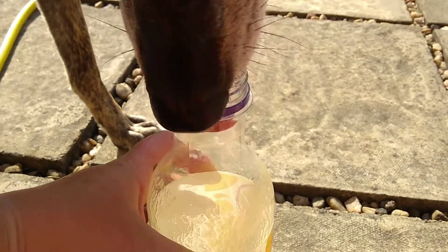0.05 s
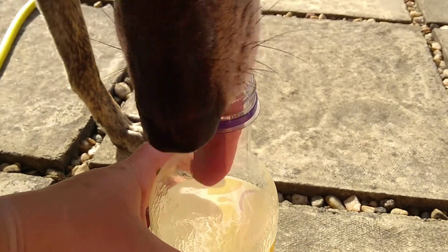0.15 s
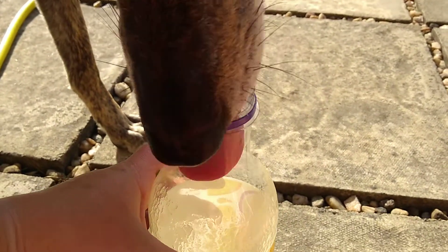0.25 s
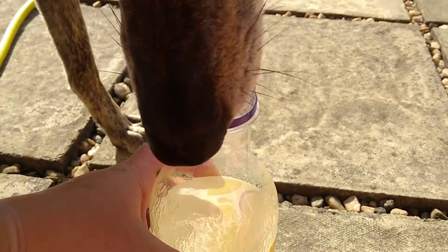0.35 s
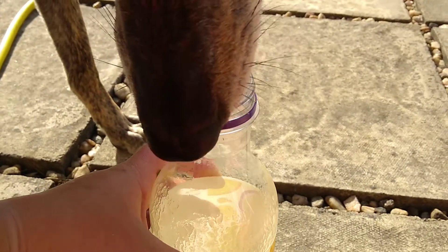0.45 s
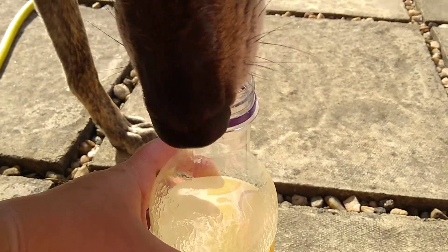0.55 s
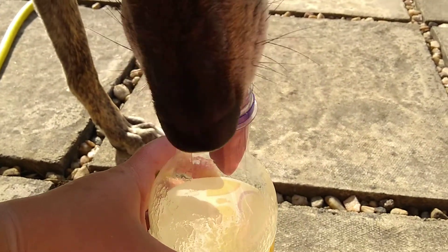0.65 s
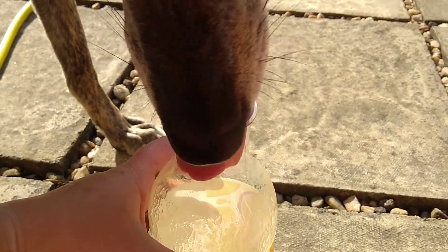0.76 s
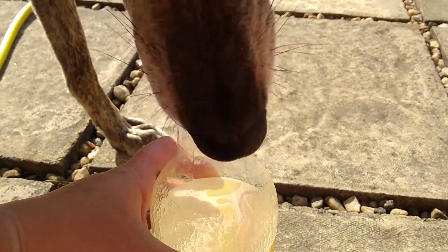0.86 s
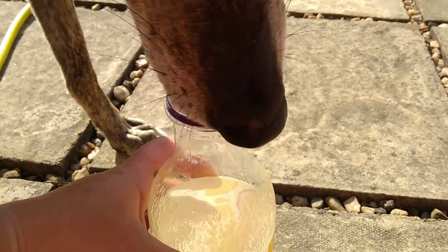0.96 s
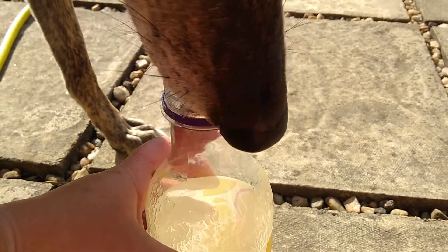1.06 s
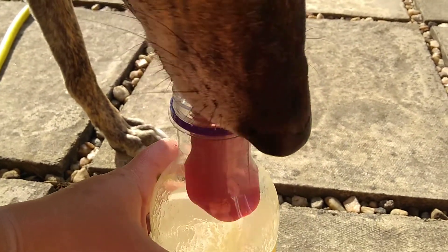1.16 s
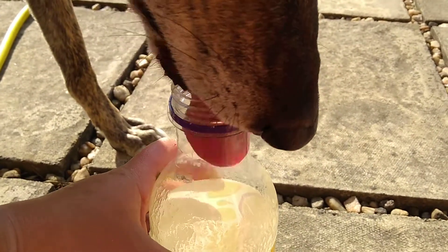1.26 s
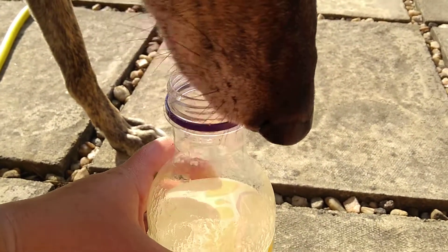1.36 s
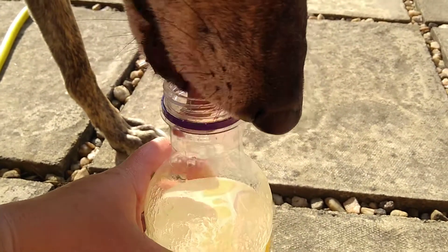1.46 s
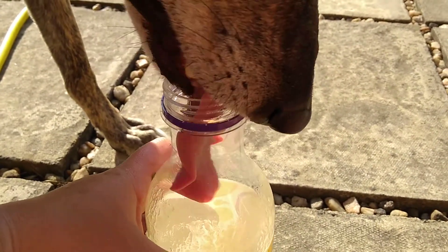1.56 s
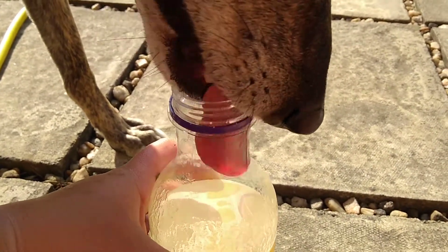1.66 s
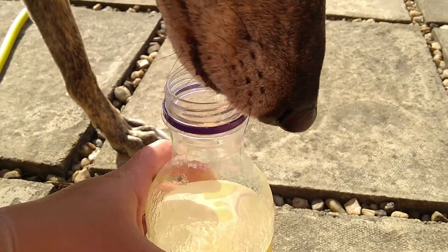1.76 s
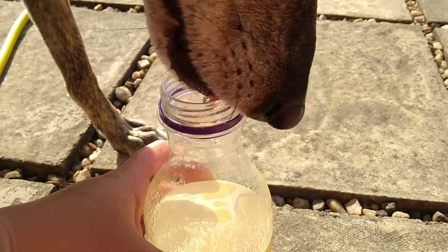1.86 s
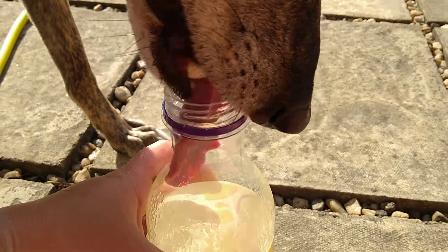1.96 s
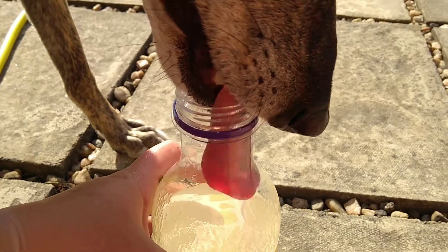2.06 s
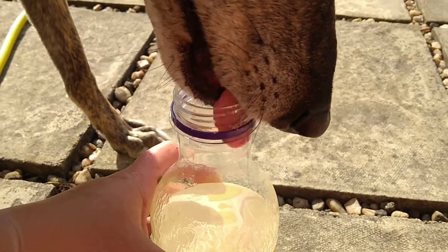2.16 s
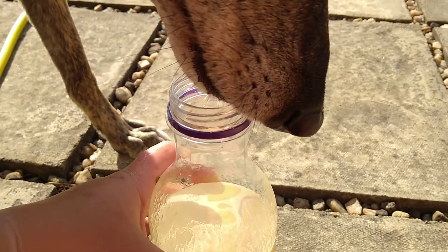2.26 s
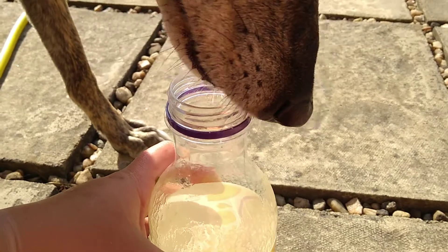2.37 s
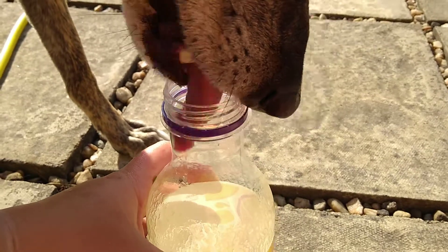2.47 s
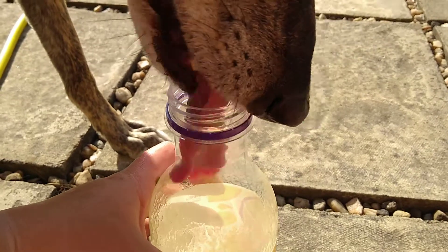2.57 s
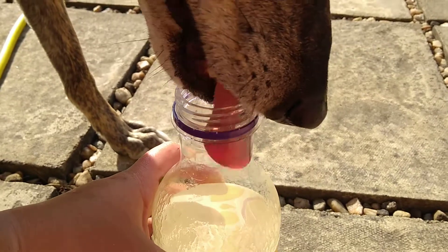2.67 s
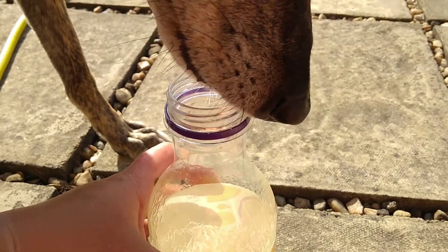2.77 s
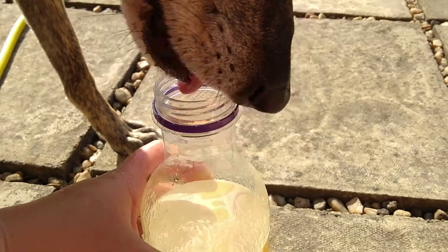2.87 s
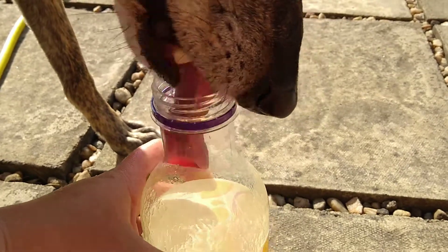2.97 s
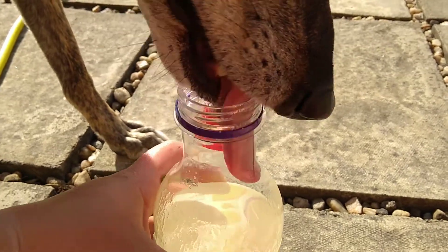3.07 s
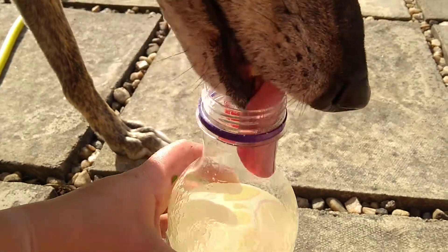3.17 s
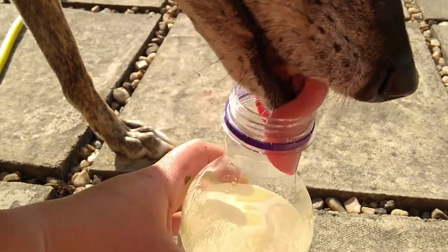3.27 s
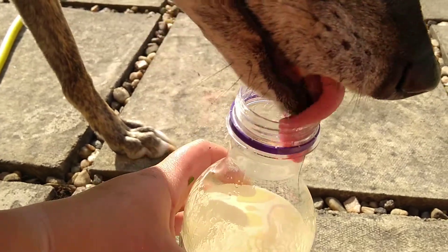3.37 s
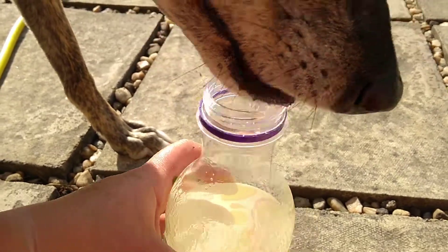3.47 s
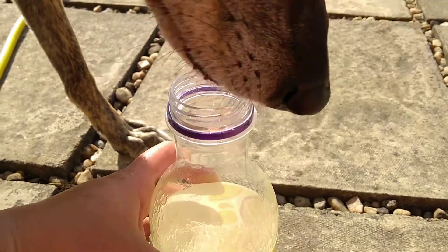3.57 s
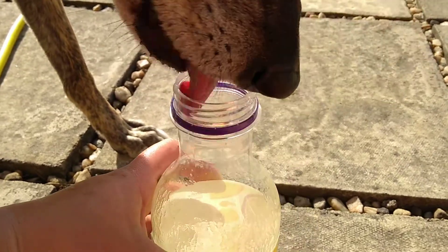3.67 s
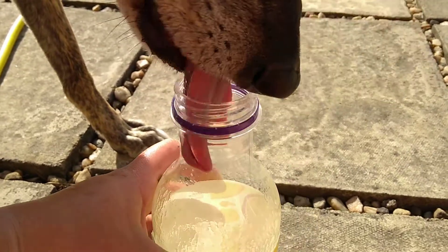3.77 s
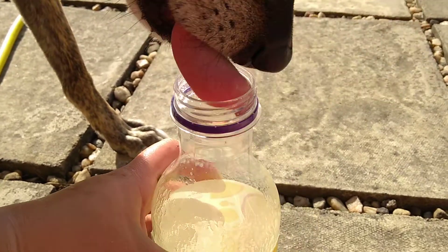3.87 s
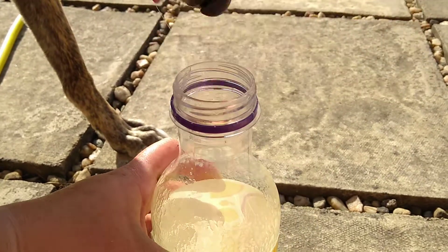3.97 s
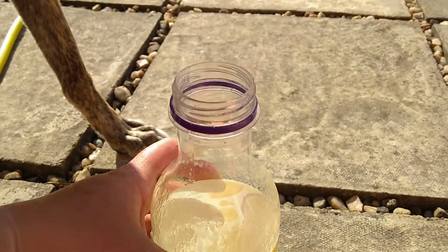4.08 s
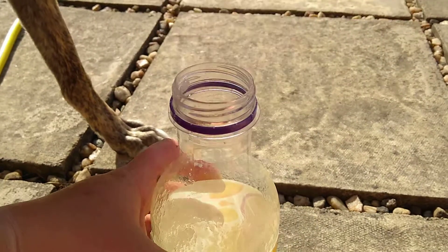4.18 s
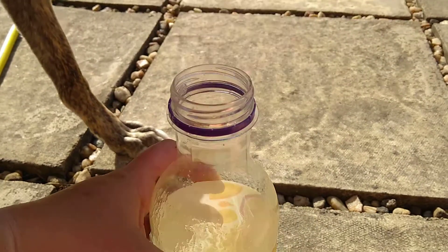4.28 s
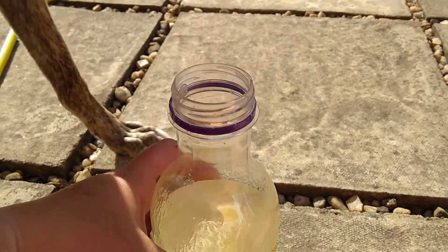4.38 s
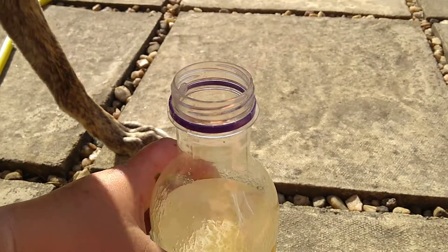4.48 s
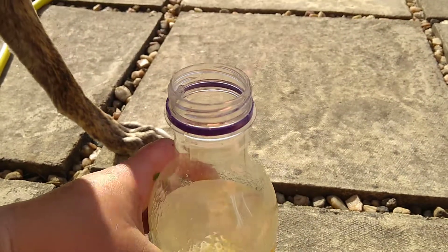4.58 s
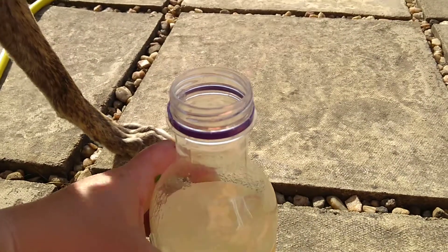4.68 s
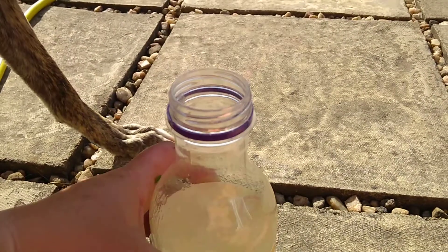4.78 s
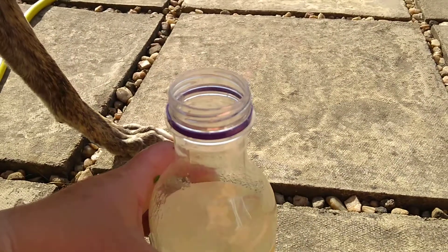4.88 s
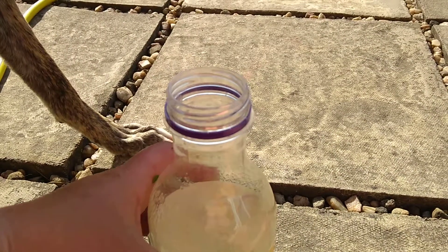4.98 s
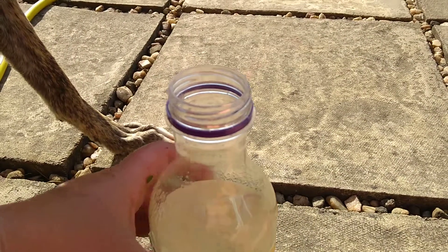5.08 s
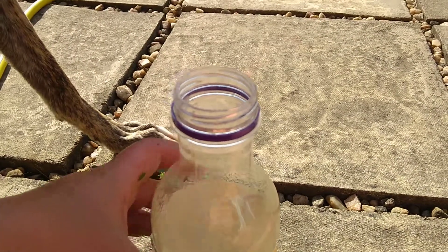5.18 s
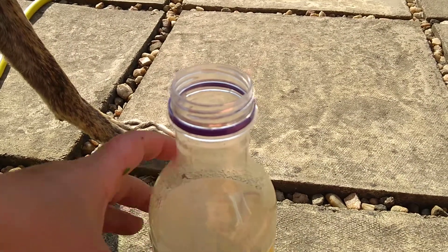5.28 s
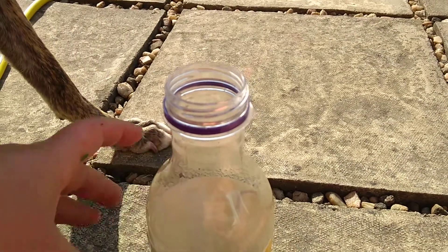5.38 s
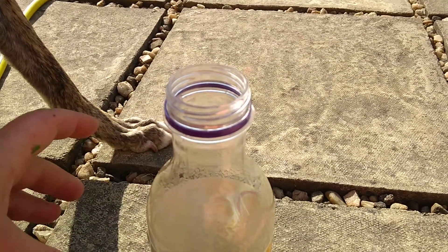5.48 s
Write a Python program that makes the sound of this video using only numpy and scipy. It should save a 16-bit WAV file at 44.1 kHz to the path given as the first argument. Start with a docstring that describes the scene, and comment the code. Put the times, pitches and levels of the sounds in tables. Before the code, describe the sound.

Close-up outdoor wet mouth sounds: a dog's tongue smacks and clicks inside a bottle neck, each lick leaving sticky squelch and fizzing saliva. The densest lapping is in the first three seconds, with low air-filled pops and knocks. Then sparse bubbly gulps and a slurp, the dog lifts away, and only small wet ticks and light hand movement on plastic are heard over low air rumble and a gentle breeze. Dry patio, little echo.

```python
"""A dog laps from the neck of a plastic bottle on a patio, close to two microphone ports.
Films of saliva on tongue and lips tear with wet snaps: short bursts of noise shaped by resonances.
Tongue pops leave the bottle's air humming; knocks and single bubbles are decaying sine tones.
Clouds of tiny ticks make wet squelch, hiss and fizz, and filtered slips make skin rub on plastic.
Below lies a low outdoor rumble of filtered noise, joined by a light gust of wind.
"""
import sys
import numpy as np
from scipy import signal
from scipy.fft import rfft, irfft
from scipy.io import wavfile
from scipy.ndimage import uniform_filter1d

SR = 44100
rng = np.random.default_rng(int(sys.argv[2]) if len(sys.argv) > 2 else 0)


def generate_wav(sig):
    """Save sig (samples, or channels by samples) to the path in sys.argv[1] as 16-bit PCM at SR."""
    pcm = np.round(np.clip(np.atleast_2d(sig).T, -1, 1) * 32767).astype(np.int16)
    wavfile.write(sys.argv[1], SR, pcm)


N = 243873

# centres of the eight bands that describe a snap: pitch_hz
SNAP_BANDS = [450, 1150, 1750, 2600, 3700, 5500, 7500, 11500]
# wet snaps of the tongue, later of fingers on the bottle:
# start_s, eight columns of level_db (one per snap band), air_pocket_hz, tearing_s
LICKS = [(0.0695, 18.5, 9.5, 0, 5.5, -17, -21, -7, -20, 1340, 0.0014),
         (0.2046, 14, 12, -4, -17, 5, -42, -15, -30, 1010, 0.0022),
         (0.242, 14.5, 16.5, 14.5, 11, 17.5, 6, 8.5, -6, 1930, 0.00065),
         (0.418, -23, -34, -28.0, -35.0, -27, -21, -12, -12.5, 8650.0, 0.0007),
         (0.447, 20, 12.5, 12, 5, 26, 4.5, -3, -7, 3980, 0.00065),
         (0.4657, 15, 20, -5, 9, 15, -5, -5, -12.5, 3420, 0.00034),
         (0.7747, 8, 21.5, 18.5, 8, 20, 6, 2, -3.5, 3670, 0.00056),
         (0.8623, 6, -19, -4, -12, -8, -11, -27, -17, 1130, 0.0041),
         (0.9526, 1.5, -4, -9, -14, -1, -8.5, -13, -27.5, 2600.0, 0.00054),
         (0.998, -11, 12.5, 6, 3, -1.5, -3, -7, -18, 5900, 0.0027),
         (1.0117, -4, 1.5, -10.5, -15.5, -18, -12, -16, -29.5, 940, 0.0006),
         (1.056, -17.5, -13, -5.5, -9, -12.5, -13, -20, -30.5, 3100, 0.0014),
         (1.185, 9.5, 13.5, -6, -26, -3, -34, -46, -39, 1080, 0.0017),
         (1.2116, 27.5, 25.5, 21.5, 15, 16, 14, -1.5, -6, 2430, 0.00054),
         (1.234, -5, -10, -8, -16, 0, -20, -31.0, -37.5, 3630, 0.00031),
         (1.291, 8.5, -8, -17.0, -24, -14, -11, -26, -46.5, 3740, 0.00025),
         (1.331, 4, 7.5, 11, 8, 7, -0.5, -6, -14.5, 2830, 0.00061),
         (1.4586, 5.5, 3.5, -4, -30, -7, -28, -33, -28.5, 1380, 0.002),
         (1.4684, 0, -14, -22, -37, -1.5, -25, -13, -28, 4200, 0.0018),
         (1.5293, -40, -6, -5, -17, 2, -12, -27, -29, 3720, 0.0014),
         (1.548, -23, -18, -14, -15, -14, -20, -30, -38, 2650, 0.00092),
         (1.5841, 19.5, -20, -17, -3, 2, 2, -17, -35, 2460, 0.0003),
         (1.644, 17, 8, -10, -5, -17, -7, -16, -32, 3300, 0.0015),
         (1.6538, 17, 22.5, 14.5, 10, 19, 4, 1, -12, 3520, 0.00056),
         (1.8248, 9.5, 3, -6, 0, 14, 2, -7, -27, 3550, 0.0018),
         (1.8346, 22, 9, -1, 4.5, 11, 3, -3, -9.5, 4100, 0.0012),
         (1.88, -2, 2, 4, -15, -13, -11, -6, -16, 6100, 0.0017),
         (2.0019, 1, -7, -3, -7, 10, 3, -4, -13.5, 6100.0, 0.00079),
         (2.057, 9, 2, -8, -8, -25, -5, -34, -45, 1230, 0.0033),
         (2.0656, -8, 15.5, -5, -5, 5, -9, -3, -26, 1090, 0.0085),
         (2.083, 21, 4, 20, 5.5, 15.5, 4, -0.5, -7.5, 3740, 0.00046),
         (2.143, 14, -23, -9, -15, -3, -1.5, -23, -32, 3660, 0.00053),
         (2.2788, -3, 12, 0.5, -9, 18, 0, -7, -11, 4020, 0.00068),
         (2.3004, 19, 13.5, 1, -8, 4, 0, -5, -12, 3800, 0.001),
         (2.3218, 24.5, 15.5, 2, 4.5, 22.5, 4.5, -0.5, -15, 4260, 0.0006),
         (2.364, 14, 16.5, 0, 6, 15.5, 15, 4, -5, 3570, 0.00041),
         (2.535, -41, -10.5, -18, -17, 1.5, -2, -36, -37, 4730, 0.0018),
         (2.557, 5.5, -33, -6, -4.5, 1, -7, -14, -15, 2560, 0.00056),
         (2.632, -8, -2, -26, -18, -4.5, -25.0, -35, -45.5, 1140, 0.0041),
         (2.656, -8, 13, -8, -16, 3, -13, -9, -16, 3500, 0.00034),
         (2.659, 10, 18, 16.5, 6.5, 20, 0, -3.5, -22, 3530, 0.00094),
         (2.7738, -35, -6, -12, -14.5, 1, -18, -13, -12, 2800, 0.0069),
         (2.871, -16, -8, 1, -15, -16, -23, -19.5, -22, 1630, 0.0026),
         (2.89, -22, -2, 4, -21, 7.5, -8, -10.5, -8.5, 3430, 0.0027),
         (3.086, 6, 6, 4, -6, 6, -11, -7.5, -21, 1050, 0.0024),
         (3.6064, 5, 0, 2.5, -8, 2.5, -31.5, -40, -42, 1020, 0.0011),
         (3.622, 9, -1, -13, -21, -3, -43, -42, -51, 1043, 0.0035),
         (3.833, -12, -38, -4, -7.5, 8, -29.5, -12.5, -32, 2740, 0.0012),
         (3.876, -19, -34, -12, -21, -5, -33.5, -15.5, -17, 3600, 0.0013),
         (3.902, -24, -34, -25, -26, -17, -30.5, -23, -23, 3280, 0.00075),
         (3.928, -24, -24, -24, -22, -8, -38, -22.5, -31, 3060, 0.00048),
         (3.973, -19, -12, -30, -30, -14, -30, -12, -15, 1290, 0.00089),
         (4.086, 6.5, 9, 0, -17, 1, -10, -4, -18, 810, 0.0025),
         (4.111, -11, -13, -21, -25.5, -21.0, -17.5, -12, -30, 3600, 0.0018),
         (4.1444, -3, 3, -18, -30, -15, -21, -18.5, -39, 3540, 0.00055),
         (4.1476, -1, 15.5, 8.5, -6.5, 17.5, -5, -21, -33.5, 3400, 0.00047),
         (4.198, -11, -24, -11, -21, -4, -26.5, -39, -39, 3000.0, 0.00023),
         (4.234, -31, -10, -17, -43, -6, -26, -10, -12, 1000, 0.0059),
         (4.271, -24, -21, -33, -38, -27, -32, -19, -26, 3600, 0.001),
         (4.481, -31.5, -29.5, -31.0, -40.5, -37.5, -21, -34, -50.5, 6020, 0.0035),
         (4.528, 3.5, -28.5, -20.5, -25, -26.5, -10.5, -11, -32, 2910, 0.0027),
         (4.546, -17, -19, 1, -10.5, -5.5, -3, -7, -13, 4530, 0.0047),
         (4.563, -25, -12.5, -6, -13, -16, -6.5, -15, -16.5, 3450.0, 0.0034),
         (4.575, -35, -26, -16, -16, -18, -6, -20, -18, 4940, 0.0015),
         (4.644, -37.5, -30, -35, -47, -39.5, -30.5, -7, -28.5, 8450, 0.0019),
         (5.016, -5.5, -9.5, -14, -20, -18, -47.5, -41, -48, 1083, 0.00018),
         (5.126, 10, -35.5, -8, -23, -15, -23.5, -24, -25, 4020, 0.0032),
         (5.1502, -39, -3, -33.5, -10, -16, -30, -43.5, -41, 2925, 0.00032),
         (5.368, 4.5, -14, -10, -16, -22, -33, -9.5, -36.0, 1810, 0.0034)]
# colour that the bottle and muzzle give each snap: pitch_hz, gain_db
BODY_COLOUR = [(40, -40.5), (130, -10), (300, -4), (560, -8), (900, -9.5), (1150, -5), (1500, -9.5),
               (2050, -2), (2500, 3), (3200, -4.5), (3780, -7), (4600, -0.5), (6200, -4.5), (16000, -6.5)]
# the air column of the bottle's neck: pitch_hz, half_width_hz, boost_db
NECK_MODES = [(1135, 13, 3.5), (2620, 380, 6), (3690, 230, 3.5)]
# the tongue pops out of the neck and the bottle's air hums:
# start_s, settled_pitch_hz, pop_level_db, hum_level_db, time_to_fall_60_db_s
PLOPS = [(0.449, 199, -29, -29.5, 0.33), (1.836, 196.4, -21.5, -19, 0.25),
         (2.3231, 194.6, -15.5, -21.5, 0.39), (2.3652, 194.1, -11.5, -17, 0.23),
         (2.66, 160, -39, -26, 0.17), (3.086, 146, -30, -26, 0.21), (3.609, 204, -49, -24, 0.31)]
# the tongue slaps the neck and the air pocket behind it knocks:
# start_s, pitch_at_peak_hz, peak_level_db, time_to_peak_s
KNOCKS = [(0.0701, 348, -29.5, 0.004), (0.4237, 270, -29, 0.0062), (0.863, 365, -31.5, 0.0047),
          (1.5864, 342, -20.5, 0.003), (1.8242, 400, -32.5, 0.0055), (2.0033, 294, -18.5, 0.0015),
          (2.2787, 315, -28.5, 0.0053), (2.3012, 300, -18.5, .0032), (3.416, 335, -30.5, 0.014),
          (3.483, 456, -33, 0.0034)]
# single bubbles in the liquid on the tongue and in the neck:
# start_s, starting_pitch_hz, level_db, time_to_fall_60_db_s
GULPS = [(.08, 534, -25, 0.046), (0.088, 966, -31, 0.047), (0.091, 1130, -35, 0.017),
         (0.105, 587, -33, 0.035), (0.2057, 1014, -13, 0.023), (.205, 585, -23, 0.049),
         (0.617, 1160, -42, 0.034), (.862, 1115, -31, 0.042), (0.924, 1090, -44, 0.019),
         (.975, 900, -46, 0.011), (1.0787, 3880, 2, 0.0034), (1.0812, 3480, -4.5, 0.004),
         (1.092, 800, -21.5, 0.016), (1.825, 1130, -22.5, 0.021), (1.834, 1070, -15.5, 0.023),
         (1.854, 620, -16, 0.026), (1.863, 646, -38, 0.023), (1.878, 1700, -25.5, 0.019),
         (1.881, 770, -28, 0.033), (1.887, 957, -27, 0.029), (1.897, 680, -27, 0.013),
         (2.279, 1115, -27.5, 0.038), (2.3215, 720, -13.5, 0.026), (2.355, 1112, -31, 0.061),
         (2.363, 705, -6.5, 0.017), (2.379, 1125, -27, 0.032), (2.378, 518, -22, 0.04),
         (2.517, 1047, -27, 0.023), (2.828, 844, -47, 0.03), (2.848, 677, -41, 0.069),
         (2.868, 940, -50, 0.022), (2.883, 1150, -34, .025), (3.086, 1084, -29, .03),
         (3.089, 753, -36, 0.026), (3.414, 657, -31, 0.059), (3.427, 1110, -50, 0.022),
         (3.44, 785, -26.5, 0.046), (3.444, 647, -23.5, 0.046), (3.481, 840, -23, 0.027),
         (3.507, 880, -37, .035), (3.524, 1230, -47, .04), (3.549, 1213, -33, 0.035),
         (3.605, 989, -24, 0.15), (3.62, 1180, -23.5, 0.034), (3.621, 720, -22, 0.028),
         (3.699, 1015, -42, 0.064), (4.067, 1080, -38.5, 0.043), (4.0875, 764, -19, 0.022),
         (4.235, 953, -37.5, 0.047), (4.677, 1135, -34.5, 0.04), (4.76, 1067, -35, 0.032),
         (4.705, 920, -41, .05), (5.016, 1067, -24.5, 0.033), (5.19, 554, -39, 0.056)]
# tongue, muzzle or hand slides on wet plastic:
# start_s, rise_s, fall_s, first_pitch_hz, last_pitch_hz, filter_width_hz, level_db
SLIDES = [(0, 0.0012, 0.053, 670, 610, 400, -37), (.069, 0.015, 0.12, 830, 784, 790, -40.5),
          (0.375, 0.011, 0.086, 3800, 3900, 600, -38.5), (0.713, 0.011, 0.021, 1030, 1100, 248, -45),
          (0.949, 0.055, 0.3, 930, 780, 496, -48.5), (1.752, 0.031, 0.024, 3670, 3900, 705, -37.5),
          (1.842, 0.012, 0.16, 584, 930, 700, -34.5), (1.949, 0.016, 0.021, 4140, 4340, 2000, -43),
          (2.17, 0.067, .045, 3630, 3770, 700, -36.5), (2.84, 0.057, 0.02, 770, 1250, 424, -34.5),
          (3.092, 0.018, 0.065, 960, 805, 604, -39), (3.265, 0.12, 0.33, 3560, 3570, 267, -43),
          (3.408, 0.02, 0.26, 343, 427, 256, -41), (3.41, 0.013, 0.32, 674, 840, 285, -43.5),
          (3.42, .1, 0.067, 13000, 13000, 4000, -52), (3.472, 0.012, 0.021, 3360, 3150, 1160, -33),
          (3.831, 0.0055, 0.067, 2870, 2800, 682, -53.5), (3.839, 0.041, 0.22, 3600, 3200, 694, -48),
          (3.909, 0.05, 0.081, 1280, 920, 127, -44.5), (3.849, 0.15, 0.17, 8600, 9600, 1830, -56),
          (3.848, 0.16, .11, 12500, 13200, 3500, -56.5), (4.44, 0.041, 0.05, 5900, 5950, 886, -54.5),
          (4.668, 0.016, 0.18, 998, 940, 201, -45.5), (4.694, 0.0057, 0.19, 2750, 2670, 402, -55),
          (4.984, 0.017, 0.089, 3380, 3280, 870, -53), (4.99, 0.016, 0.21, 1100, 1054, 289, -51),
          (5.121, 0.067, 0.153, 510, 560, 89, -46.5), (5.39, 0.1, 0.25, 3380, 3200, 500, -49),
          (5.4, 0.057, .23, 5270, 5270, 500, -54), (5.443, 0.019, 0.11, 1000, 1070, 400, -49),
          (5.41, 0.036, 0.15, 12900, 13500, 4000, -51)]
# the tongue draws air through saliva, or skin brushes the wet bottle:
# peak_s, rise_s, fall_s, hiss_level_db, froth_level_db
SLURPS = [(0.065, 0.096, 0.097, -41.5, -50.5), (.42, 0.64, 0.39, -49, -58.5), (.74, 0.25, 1, -50.5, -74),
          (1.05, 0.11, 0.19, -45, -60.5), (1.58, 1, 0.55, -58, -80), (1.79, .12, 0.05, -44.5, -55),
          (1.95, 0.2, 0.087, -46.5, -53.5), (2.247, 0.16, 0.05, -42, -50.5), (2.5, 0.16, 0.2, -52, -66),
          (2.93, 0.076, 0.084, -46.5, -55), (3.518, 0.17, 0.064, -40, -47), (3.9, 0.052, 0.077, -64, -74),
          (4.02, 0.12, 0.09, -86, -79), (4.22, 0.062, 0.049, -52.5, -83), (4.554, 0.098, 0.23, -72, -60),
          (5.478, 0.094, 0.11, -60, -45.5)]
# how a snap stirs each kind of bubbling: level_after_full_snap_db, time_to_fall_60_db_s, resting_level_db
SQUELCH_STIR = (-37, 0.3, -65)
HISS_STIR = (-47, 0.44, -71)
FROTH_STIR = (-58.5, 0.66, -75)
# colours of the background noises: pitch_hz, relative_level_db
RUMBLE_SPECTRUM = [(20, -48), (45, -22.5), (75, -8.5), (100, 1), (125, -2.5), (200, 3), (310, 4), (400, -7),
                   (520, -21), (900, -45), (2000, -57)]
SQUELCH_SPECTRUM = [(200, -41), (450, -1), (700, -5), (1100, -3), (1500, -12), (1850, -7), (2150, -26.5),
                    (3000, -28.5), (6000, -54)]
HISS_SPECTRUM = [(1400, -18.5), (1900, -22), (2250, -11.5), (2600, 1), (3200, -2.5), (3750, 4.5),
                 (4150, -13.5), (4600, -5), (6000, -47.5), (10000, -55.5)]
FIZZ_SPECTRUM = [(2500, -27.5), (4700, 6.5), (5800, 0), (6300, 3), (7200, 1), (8800, -1), (9700, -3.5),
                 (10400, 3), (11800, -9), (13000, -2.5), (13400, -15.5), (14000, -4), (15000, -21),
                 (16000, -42)]
BREEZE_SPECTRUM = [(15, -27), (40, -25.5), (70, -6.5), (86, -6.5), (97, 4.0), (112, -2.0),
                   (150, 3), (300, -17.0), (900, -61.0)]
# rise and fall of the outdoor rumble: time_s, relative_level_db
RUMBLE_LEVEL = [(0, -38.5), (.42, -42.5), (.58, -44.5), (.8, -41.5), (1.25, -43), (1.38, -46),
                (1.55, -46.5), (1.76, -48.5), (2.0, -42.5), (2.9, -46), (3.25, -49), (3.499, -36.5),
                (3.799, -41), (4.201, -37), (4.5, -42.5), (4.72, -39), (4.92, -36.5), (5.2, -38.5),
                (5.53, -35)]
# how much the rumble differs between the ports: pitch_hz, side_minus_mid_db
RUMBLE_WIDTH = [(30, 18), (70, 10.5), (130, 5.5), (300, -2), (700, 6)]
# rise and fall of the gust: time_s, relative strength (no unit)
BREEZE_LEVEL = [(2.8, 0.011), (3.1, 1.3), (3.7, 2.45), (4.3, 1.8), (4.65, 1.6), (4.95, 2.3), (5.5, 0.33)]
# how long the patio's echo lasts: pitch_hz, time_to_fall_60_db_s
PATIO_DECAY = [(150, 0.13), (1000, 0.48), (3500, 0.075), (8000, 0.7), (15000, 0.97)]
# how the two microphone ports differ in timing: pitch_hz, left_lead_radians
PORT_PHASE = [(0, 0), (1400, 0), (2000, 2.7), (2250, 3.14), (2850, 4), (3300, 5.9), (4100, 8.1),
              (4450, 9.4), (4900, 9.9), (5400, 12.6), (6300, 13.7), (6700, 16.4), (9000, 16.8), (12500, 25),
              (16000, 35)]
# how the two microphone ports differ in level: pitch_hz, left_minus_right_db
PORT_BALANCE = [(130, -3), (330, 3.5), (600, -1), (1000, -0.5), (1700, 2), (2600, -3.5), (4000, 1.5),
                (6400, -7), (8500, -7.5), (11000, -9.5), (13000, 5), (16000, -4)]
# small cavities in front of the microphones: pitch_hz, half_width_hz, boost_db
MIC_MODES = [(2247, 115, -1.5), (6420, 270, 3.5), (7820, 230, 4.5), (8700, 340, 6), (11060, 310, 5.5),
             (12020, 320, 8.5), (13200, 130, -9), (14220, 410, 15), (16000, 2230, -16)]

EDGE_HZ = 16000  # upper limit of the sound
SLURP_DEPTH_DB = 18  # a slurp swells and dies by this much over its rise and fall
FULL_SNAP_DB = 4.5  # a snap this strong stirs all the saliva there is
STIR_RISE_S = 0.011  # time the bubbling takes to start
SQUELCH_HOLD_DB = 6.5  # large bubbles need a snap this much stronger than small ones
LAPPING_ENDS_S = 4.1  # the dog lifts its head: later snaps stir no squelch in the neck


def gain_of(db):
    """Turns decibels into a factor for the wave's height."""
    return 10 ** (np.asarray(db) / 20)


def evened(x):
    """Scales to an average strength (rms) of 1."""
    return x / np.sqrt(np.mean(x ** 2) + 1e-20)


def read(points, hz):
    """Reads between table points on a logarithmic pitch axis, as the ear spaces pitch."""
    f, value = np.transpose(points)
    return np.interp(np.log(hz + 1), np.log(f + 1), value)


def add(mix, s, sound):
    """Mixes a sound in at time s, cutting off whatever runs past the end."""
    part = mix[..., max(round(s * SR), 0):][..., :sound.shape[-1]]
    part += sound[..., :part.shape[-1]]


def tint(x, spectrum):
    """Filters a sound with this colour and scales the result to rms 1."""
    hz = np.fft.rfftfreq(N, 1 / SR)
    return evened(irfft(rfft(x) * gain_of(read(spectrum, hz)), N))


def mode_boost(hz, modes):
    """Adds up the boost in dB of several resonances, each a rounded peak."""
    return sum(db / (1 + ((hz - f) / width) ** 2) for f, width, db in modes)


def causal(db):
    """Minimum-phase response with this gain: it rings after a blow, never before."""
    log_gain = np.log(gain_of(np.concatenate([db, db[-2:0:-1]])))
    return np.exp(np.conj(signal.hilbert(log_gain)))[:len(db)]


def ports(x):
    """A near sound reaches the left port first, and each port is shaded differently."""
    hz = np.fft.rfftfreq(2 * N, 1 / SR)
    lead = np.exp(.5j * np.interp(hz, *np.transpose(PORT_PHASE)))
    side = gain_of(read(PORT_BALANCE, hz) / 2) * lead
    return irfft(rfft(x, 2 * N) * np.array([side, 1 / side]))[:, :N]


def mostly_near(near, around, around_db):
    """Sound from the bottle's direction, plus a share that reaches each port on its own."""
    return ports(near) + gain_of(around_db) * around


def patchy(x, patch_db, size=512):
    """The colour flickers in small patches; longer frames make them narrower and slower."""
    z = signal.stft(x, nperseg=size)[2]
    field = uniform_filter1d(rng.standard_normal(z.shape[1:]), size=6, axis=0)
    field = evened(uniform_filter1d(field, size=12, axis=1))
    return signal.istft(z * gain_of(patch_db * field), nperseg=size)[1][:, :N]


def without_bass(x, corner_hz=115):
    """Takes away the deep bass below the corner pitch."""
    return signal.sosfilt(signal.butter(2, corner_hz, "highpass", fs=SR, output="sos"), x)


def rumble(db=1, patch_db=2.5):
    """Low outdoor air as noise; the deepest part pushes the two ports in opposite ways."""
    mid, side = patchy(rng.standard_normal((2, N)), patch_db, size=2048)
    width_db = read(RUMBLE_WIDTH, np.fft.rfftfreq(N, 1 / SR))
    side = irfft(rfft(side) * gain_of(width_db), N)
    level_db = db + np.interp(np.arange(N) / SR, *np.transpose(RUMBLE_LEVEL))
    return tint(np.array([mid + side, mid - side]), RUMBLE_SPECTRUM) * gain_of(level_db)


def bubbles(per_s, low_hz, high_hz, cycles, count=30):
    """Tiny saliva bubbles of many sizes, each a short, damped tick at a random time."""
    out = np.zeros(N)
    each = round(per_s * N / SR / count)
    for hz in np.geomspace(low_hz, high_hz, count):
        age = np.arange(0, 6, hz / cycles / SR)  # 1 = the tick's decay time, lasting `cycles` waves
        tick = np.sin(2 * np.pi * cycles * age) * np.sqrt(age) * np.exp(-age)
        at = rng.integers(0, N, (each, 1)) + np.arange(len(tick))
        ticks = rng.exponential(size=(each, 1)) * tick
        out += np.bincount(at.ravel(), ticks.ravel(), N)[:N]
    return evened(out)


def wet(spectrum, grains, db, patch_db, around_db, grain_db, sputter_db):
    """Bubbles burst at the muzzle in quick clumps within a soft rush of air."""
    near = gain_of(grain_db) * grains + rng.standard_normal(N)
    sound = mostly_near(near, rng.standard_normal((2, N)), around_db)
    flutter = evened(uniform_filter1d(rng.standard_normal(N), size=300))
    sputter = gain_of(sputter_db * flutter)
    return tint(patchy(sound, patch_db) * sputter, spectrum) * gain_of(db)


def stirred(times, strengths_db, full_db, t60, rest_db):
    """Gain of bubbling that each snap starts anew and that then dies down to rest."""
    coarse = np.arange(0, N, 64)  # every 64th sample is fine enough for a slow curve
    age = np.maximum(coarse / SR - times[:, None], 0)
    start_db = full_db + np.minimum(strengths_db - FULL_SNAP_DB, 0)[:, None]
    rise = np.minimum(age / STIR_RISE_S, 1)
    gain = (rise * gain_of(start_db - 60 * age / t60)).max(0)  # the strongest stirring wins
    return np.interp(np.arange(N), coarse, np.hypot(gain, gain_of(rest_db)))


def slurped():
    """Gains of hiss and froth: each slurp swells to its peak and dies away."""
    t, power = np.arange(N) / SR, np.zeros((2, N))
    for peak, rise, fall, *levels_db in SLURPS:
        away = np.maximum((peak - t) / rise, (t - peak) / fall)
        power += np.outer(gain_of(levels_db), gain_of(-SLURP_DEPTH_DB * away)) ** 2
    return np.sqrt(power)


def saliva():
    """Large bubbles squelch after snaps in the neck; small ones hiss and froth after snaps and in slurps."""
    times, low_db, neck_db, _, _, level_db = np.transpose(LICKS)[:6]
    push_db = (low_db + neck_db) / 2 - SQUELCH_HOLD_DB
    lapping = times < LAPPING_ENDS_S
    hiss_slurp, froth_slurp = slurped()
    squelch_gain = stirred(times[lapping], push_db[lapping], *SQUELCH_STIR)
    hiss_gain = np.hypot(hiss_slurp, stirred(times, level_db, *HISS_STIR))
    froth_gain = np.hypot(froth_slurp, stirred(times, level_db, *FROTH_STIR))
    large = bubbles(per_s=300, low_hz=500, high_hz=1900, cycles=2.2)
    small = bubbles(per_s=1100, low_hz=2200, high_hz=4800, cycles=3.5)
    tiny = bubbles(per_s=2000, low_hz=4500, high_hz=14000, cycles=4)
    squelch = wet(SQUELCH_SPECTRUM, large, db=-1.0, patch_db=6.0, around_db=-17.0,
                  grain_db=-11.0, sputter_db=-1)
    hiss = wet(HISS_SPECTRUM, small, db=-0.5, patch_db=2.0, around_db=7.0, grain_db=-2.0, sputter_db=-1)
    froth = wet(FIZZ_SPECTRUM, tiny, db=2.0, patch_db=5.0, around_db=9.5, grain_db=1.5, sputter_db=2.0)
    return squelch * squelch_gain + hiss * hiss_gain + froth * froth_gain


def resonate(x, hz, width):
    """A resonance of gain 1 at its peak, whose pitch follows the curve hz."""
    turn = np.exp(2j * np.pi * np.cumsum(hz) / SR)
    r = np.exp(-np.pi * width / SR)
    # shift the pitch down to zero, smooth there, then shift back
    return 2 * (turn * signal.lfilter([1 - r], [1, -r], x / turn + 1e-18)).real


def slides(slips_per_s=400, smooth=0.074, swell=2.58):
    """Wet skin sticks and slips on plastic; the gap beside it resonates and changes size."""
    out = np.zeros(N)
    for start, rise_s, fall_s, first_hz, last_hz, width_hz, db in SLIDES:
        t = np.arange(0, rise_s + fall_s, 1 / SR)
        slipping = rng.random(SR) < slips_per_s / SR
        slips = (rng.standard_normal(SR) * (smooth + slipping))[:len(t)]
        hz = np.geomspace(first_hz, last_hz, len(t))
        sound = evened(resonate(resonate(slips, hz, width_hz), hz, width_hz))
        envelope = np.interp(t, [0, rise_s, rise_s + fall_s], [0, 1, 0]) ** swell
        add(out, start, sound * gain_of(db) * envelope)
    return out


def patio(x, reflection_db, reflection_s, late_db, channels=3):
    """Quick reflections from slabs and dog, then a faint echo from the walls around."""
    shape = (channels, SR)
    first = np.arange(SR) / SR - .004  # seconds since the first reflection
    sparse = rng.standard_normal(shape) * (rng.random(shape) < .05)
    reflections = sparse * np.exp(-abs(first) / reflection_s) * (first > 0)
    hz, t, z = signal.stft(rng.standard_normal(shape) * (first > .008), SR, nperseg=256)
    fade = gain_of(-60 * t / read(PATIO_DECAY, hz)[:, None])
    late = signal.istft(z * fade, SR, nperseg=256)[1][:, :SR]
    echo = gain_of(reflection_db) * evened(reflections) + gain_of(late_db) * evened(late)
    return signal.fftconvolve(x[None], echo / np.sqrt(SR), axes=1)[:, :N]


def tear(length_s, ring, ring_s, size):
    """A film gives way in a brief crackle that holds every frequency evenly; returns its spectrum."""
    t = np.arange(size) / SR
    envelope = t / length_s * np.exp(1 - t / length_s) + ring * np.exp(-t / ring_s)
    burst = rfft(rng.standard_normal(size) * envelope)
    return burst / np.sqrt(uniform_filter1d(abs(burst) ** 2, size=50) + 1e-12)


def snap(levels_db, pocket_hz, length_s, pocket_db=6, pocket_width_hz=150, ripple_db=-0.5,
         top_fall_db=-7, slab_db=-9, slab_s=0.0029, size=4096):
    """A tearing film rings neck and air pocket, with a slight random ripple of colour and a slab bounce."""
    hz = np.fft.rfftfreq(size, 1 / SR)
    colour = read([*zip(SNAP_BANDS, levels_db), (EDGE_HZ, levels_db[-1] + top_fall_db)], hz)
    rings = mode_boost(hz, [*NECK_MODES, (pocket_hz, pocket_width_hz, pocket_db)])
    chance = evened(uniform_filter1d(rng.standard_normal(len(hz)), size=30))
    ripple = ripple_db * chance * np.minimum(hz / 5000, 1)
    delay_s = slab_s * rng.uniform(0.675, 1.3)
    bounce = 1 + gain_of(slab_db) * np.exp(-2j * np.pi * hz * delay_s)
    film = tear(length_s, ring=0.36, ring_s=0.0017, size=size)
    sound = irfft(film * bounce * causal(colour + read(BODY_COLOUR, hz) + rings + ripple))
    return sound[:size // 2]


def licks(early_db=-22, early_s=0.0012, side_db=-13):
    """Each snap, with a few faint random copies of it just before, and a second tearing for the sides."""
    out = np.zeros((2, N))
    for s, *levels_db, pocket_hz, length_s in LICKS:
        direct = snap(levels_db, pocket_hz, length_s)
        # a second random tearing that differs between the ports
        side_tearing = gain_of(side_db) * snap(levels_db, pocket_hz, length_s)
        sound = np.array([direct, side_tearing])
        add(out, s, sound)
        for lead_s in rng.exponential(early_s, size=6):
            strength = gain_of(early_db) * rng.standard_normal() * np.exp(-lead_s / early_s / 2)
            add(out, s - lead_s, sound * strength)
    return out


def knocks(sag=0.1):
    """An air pocket swells and dies in a few cycles; its pitch drops as the tongue lets it grow."""
    out, t = np.zeros(N), np.arange(SR // 6) / SR
    for s, hz, db, peak_s in KNOCKS:
        age = t / peak_s
        turns = np.cumsum(hz * (1 + sag * np.tanh(1 - age))) / SR
        envelope = gain_of(db) * (age * np.exp(1 - age)) ** 2
        add(out, s, np.sin(2 * np.pi * turns) * envelope)
    return out


def gulps(swell_cycles=2.3, climb=.06):
    """A trapped bubble swells in a few cycles and rings, its pitch climbing a little as it opens."""
    out, t = np.zeros(N), np.arange(SR // 5) / SR
    for s, hz, db, t60 in GULPS:
        turns = np.cumsum(hz * (1 + climb * np.minimum(t / t60, 1))) / SR
        swell = 1 - np.exp(-(turns / swell_cycles) ** 2)
        add(out, s, np.sin(2 * np.pi * turns) * swell * gain_of(db - 60 * t / t60))
    return out


def plops(bend=1.39, settle_s=0.0035, pop_s=0.0017, rise_s=.003, right_db=6.5, right_lag_turns=0.15):
    """Air bounces on the opening; its pitch drops as the tongue clears the neck, then hums steadily."""
    out, t = np.zeros((2, N)), np.arange(SR // 2) / SR
    side = np.array([[-.5], [.5]])  # left, right: the hum is stronger at the right port
    blocked = np.exp(-(t / settle_s) ** 2)
    for s, hz, pop_db, hum_db, t60 in PLOPS:
        lag = side * right_lag_turns * (1 - blocked)
        turns = np.cumsum(hz * (1 + bend * blocked)) / SR - lag
        pop = gain_of(pop_db) * (t / pop_s * np.exp(1 - t / pop_s)) ** 2
        hum = gain_of(hum_db + side * right_db - 60 * t / t60) * (1 - np.exp(-t / rise_s))
        add(out, s, np.sin(2 * np.pi * turns) * (pop + hum))
    return out


def breeze(db=-52):
    """A light gust brushes the microphones as the dog lifts its head: low noise that swells."""
    gust = np.interp(np.arange(N) / SR, *np.transpose(BREEZE_LEVEL))
    return tint(rng.standard_normal((2, N)), BREEZE_SPECTRUM) * gust * gain_of(db)


def scene():
    """Dog and bottle up close, with the patio around them."""
    snaps, side_tearing = licks()
    skin = snaps + without_bass(knocks()) + slides() + gulps()
    hum = without_bass(plops())
    echo = patio(skin + .5 * hum.mean(0), reflection_db=-15.0, reflection_s=0.0091, late_db=-18.0)
    near = mostly_near(skin + echo[0], echo[1:], around_db=-3.5)
    near += np.array([side_tearing, -side_tearing])  # opposite at the two ports, which widens the snaps
    return near + hum + saliva() + rumble() + breeze()


def record(dry):
    """Microphone cavities colour the sound, then come a full-scale ceiling and an upper pitch limit."""
    hz = np.fft.rfftfreq(2048, 1 / SR)
    colour = irfft(causal(mode_boost(hz, MIC_MODES)))
    heard = np.clip(signal.oaconvolve(dry, colour[None])[:, :N], -1, 1)
    limit = signal.firwin(511, EDGE_HZ, window=("kaiser", 9), fs=SR)
    return signal.oaconvolve(heard, limit[None], "same")


dry = scene()
out = record(dry)
generate_wav(out)
```